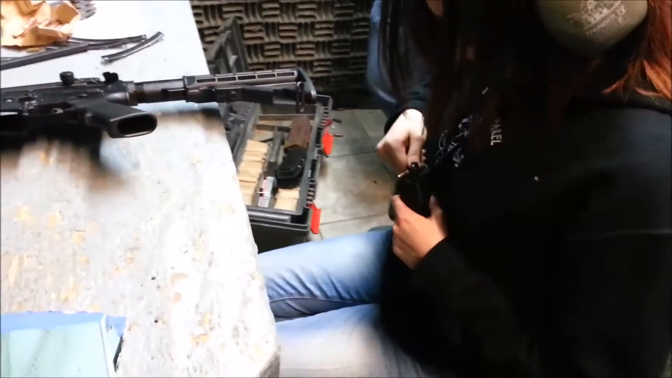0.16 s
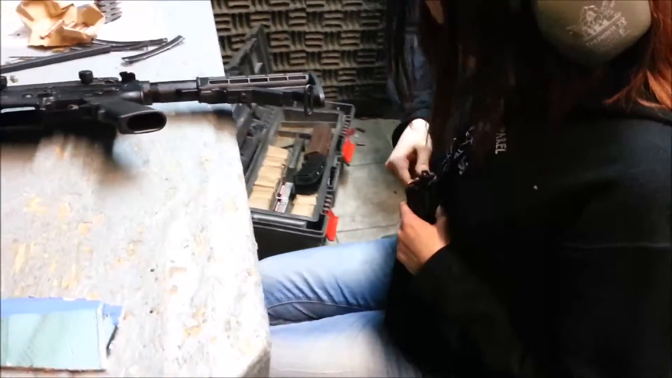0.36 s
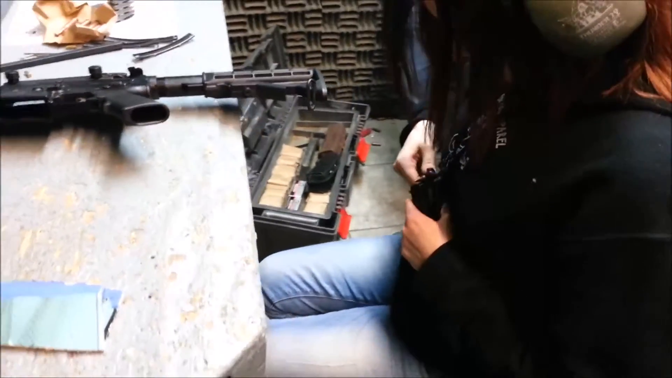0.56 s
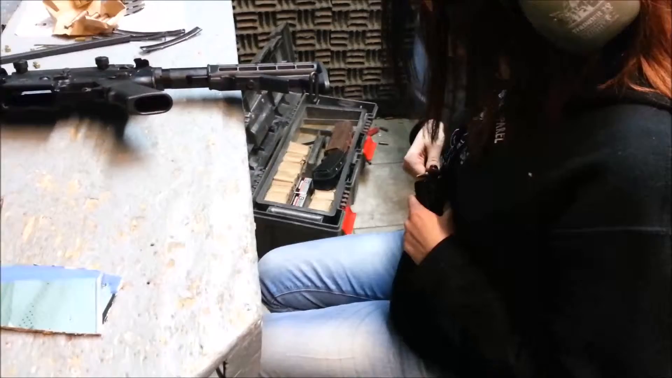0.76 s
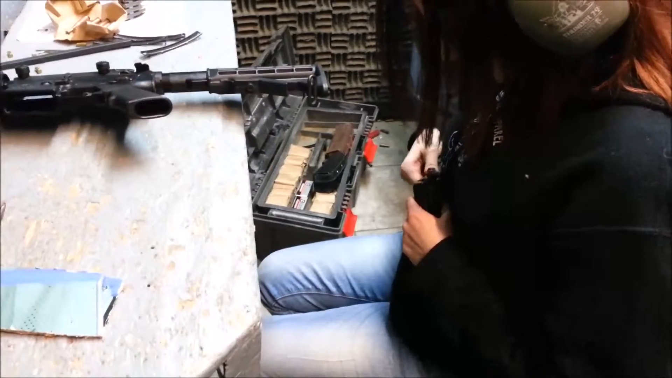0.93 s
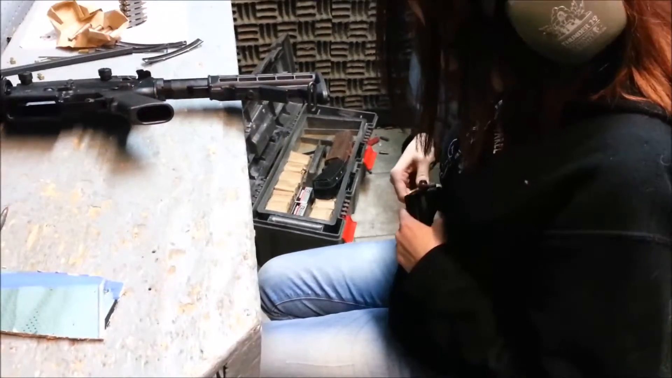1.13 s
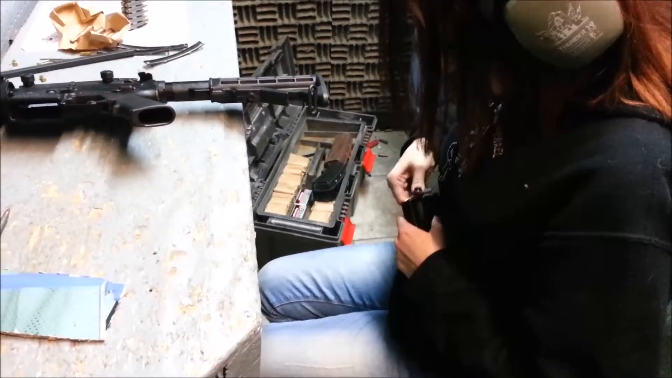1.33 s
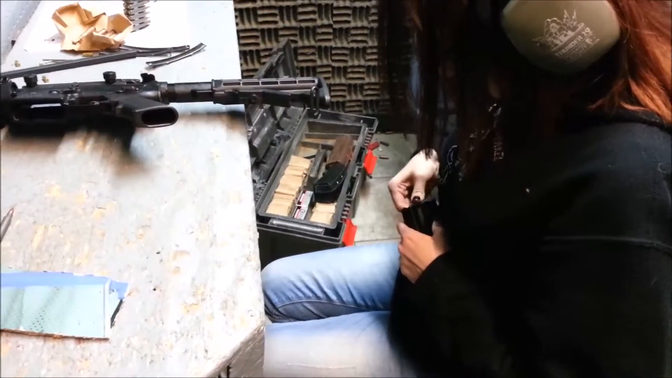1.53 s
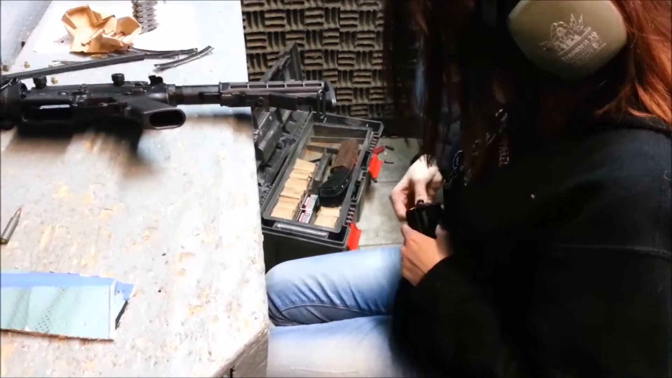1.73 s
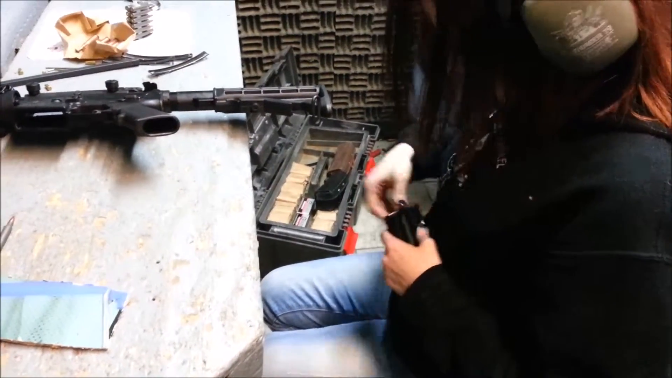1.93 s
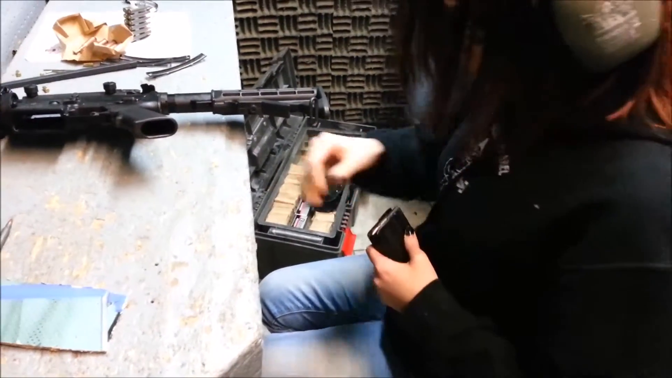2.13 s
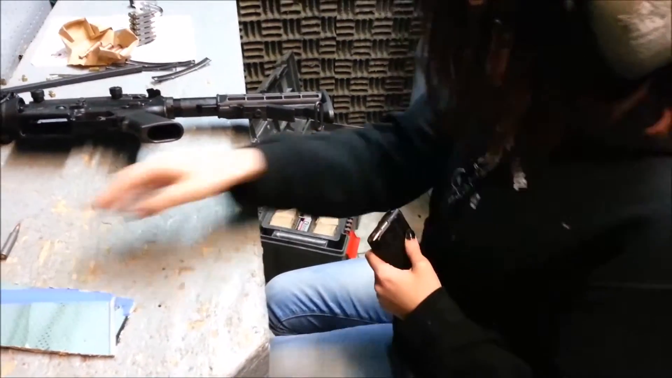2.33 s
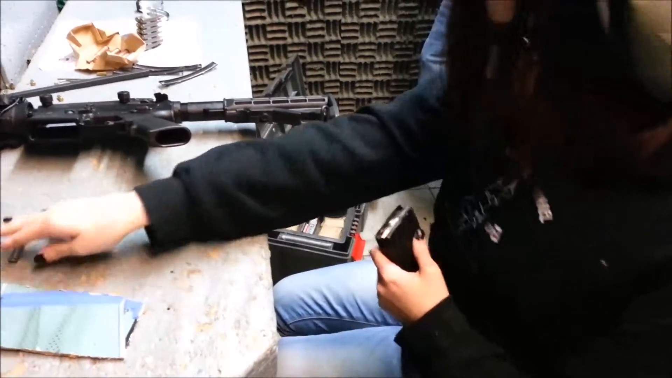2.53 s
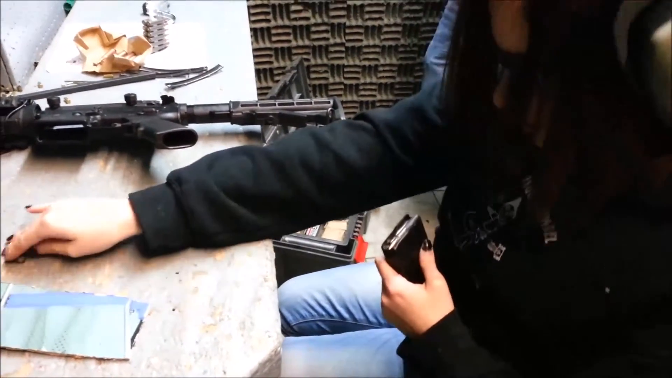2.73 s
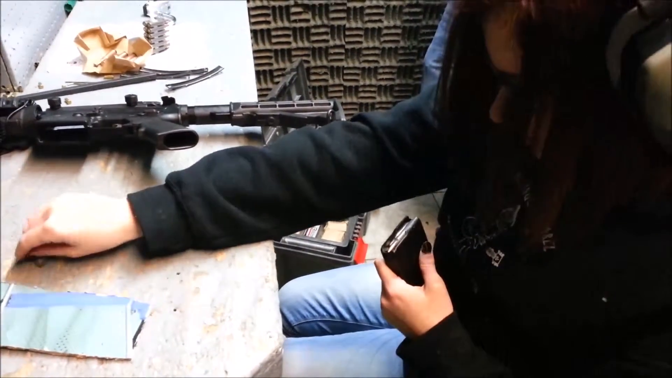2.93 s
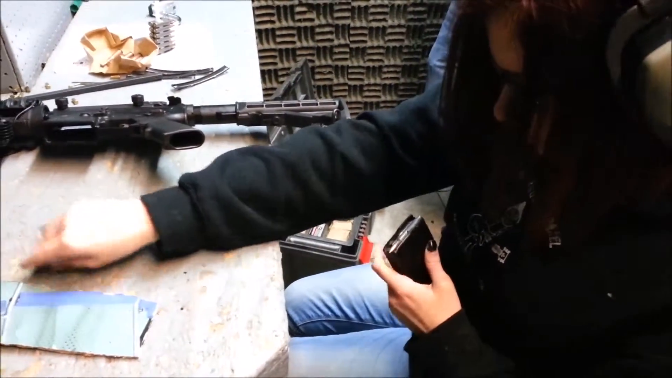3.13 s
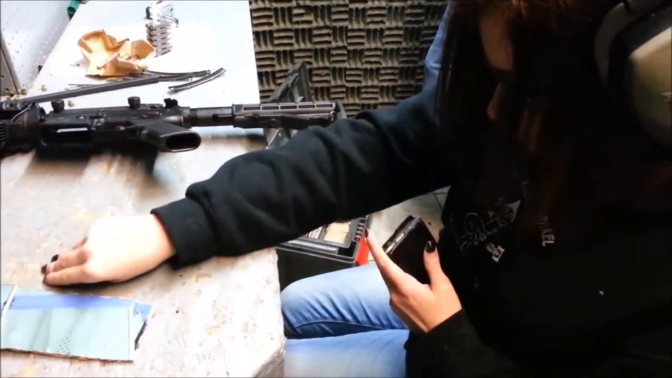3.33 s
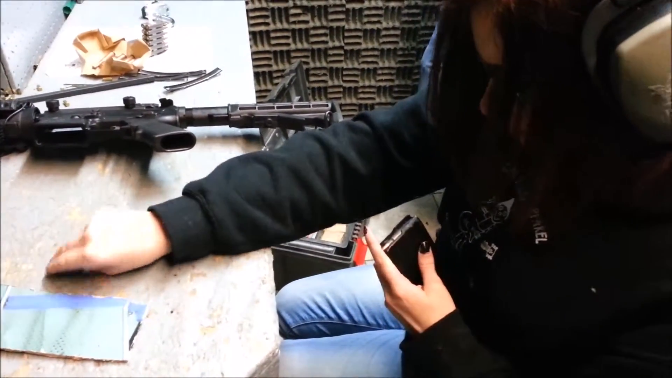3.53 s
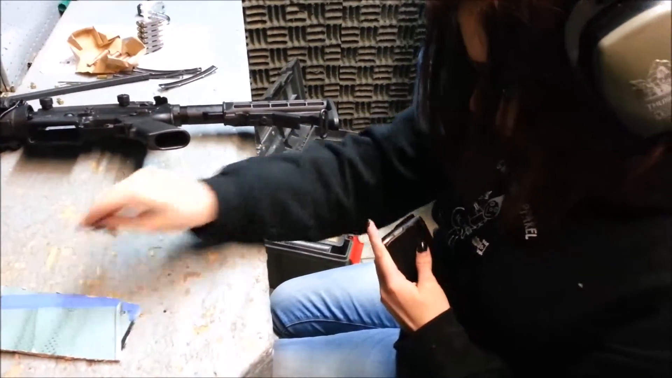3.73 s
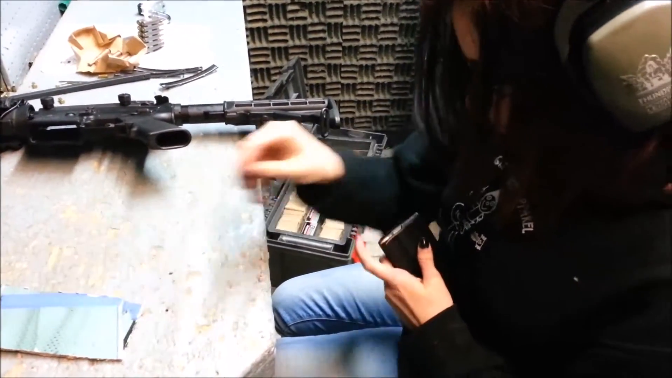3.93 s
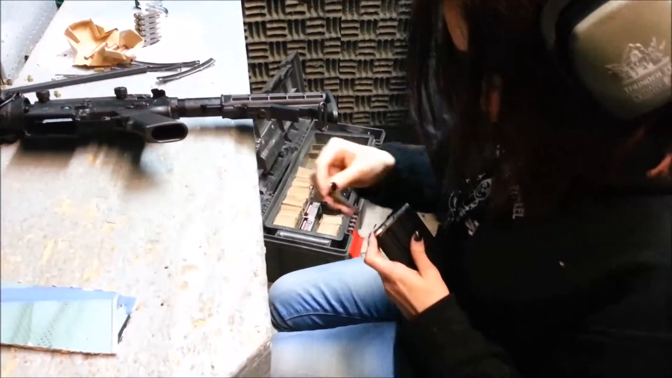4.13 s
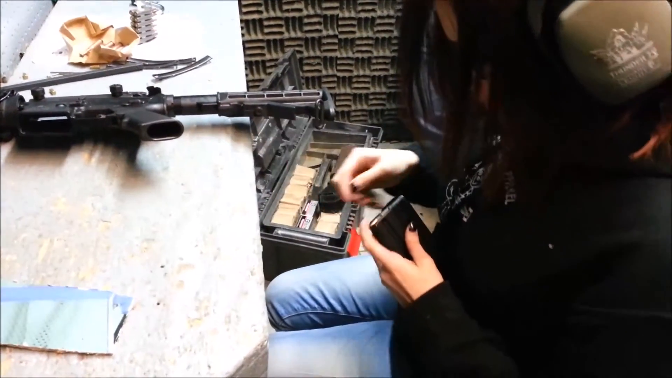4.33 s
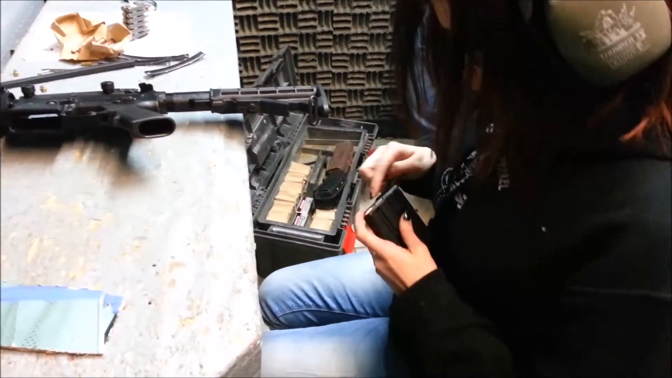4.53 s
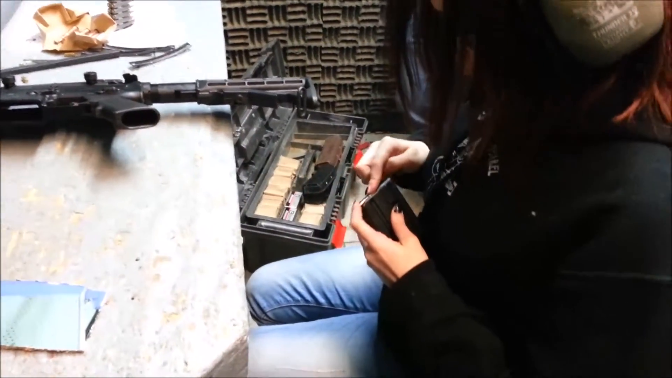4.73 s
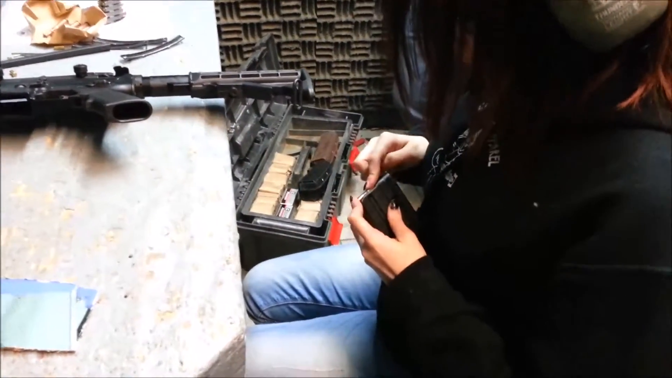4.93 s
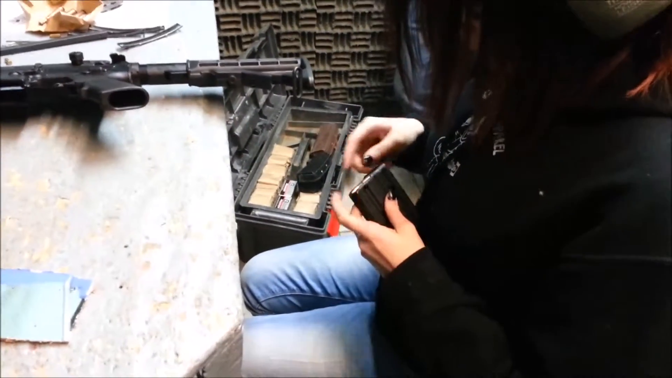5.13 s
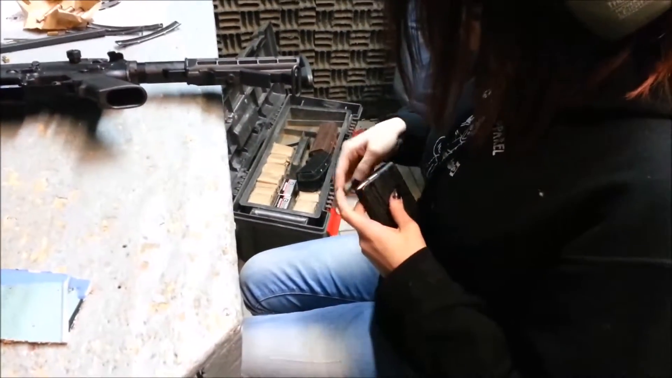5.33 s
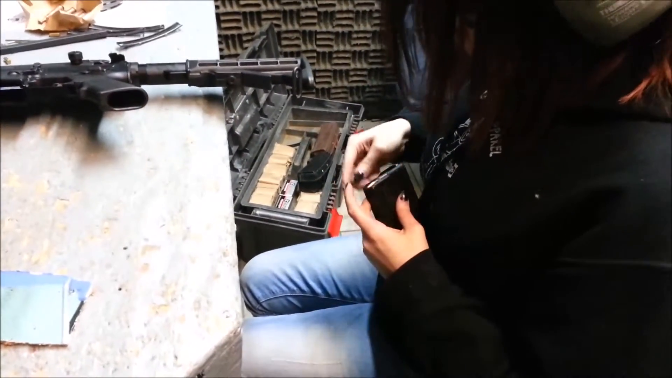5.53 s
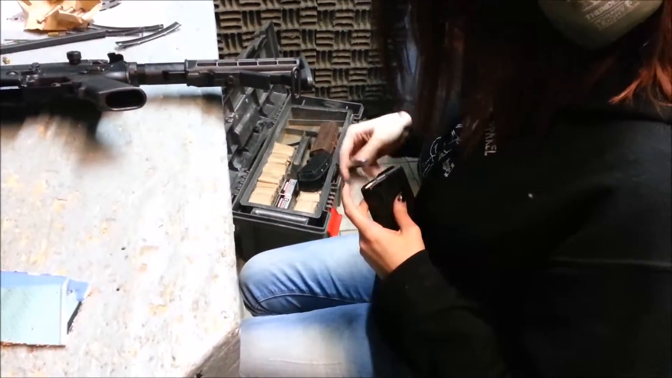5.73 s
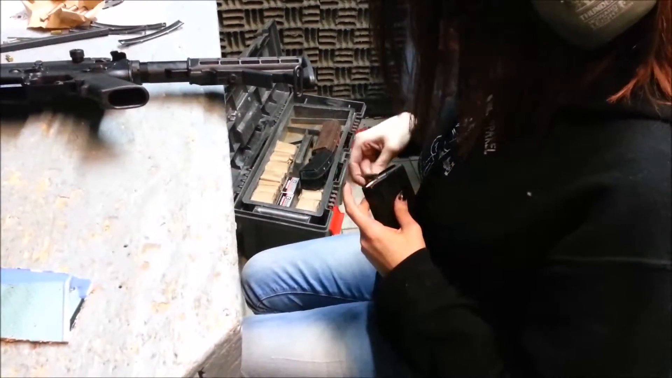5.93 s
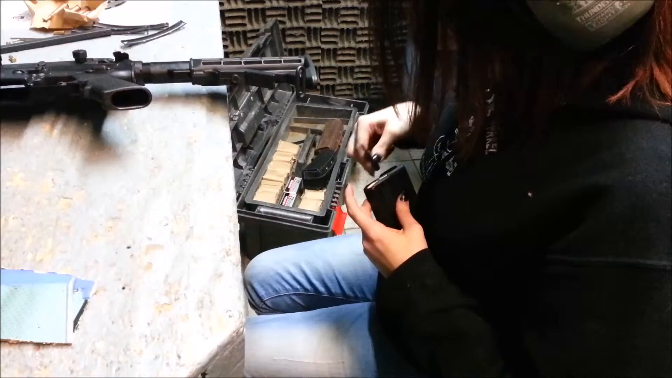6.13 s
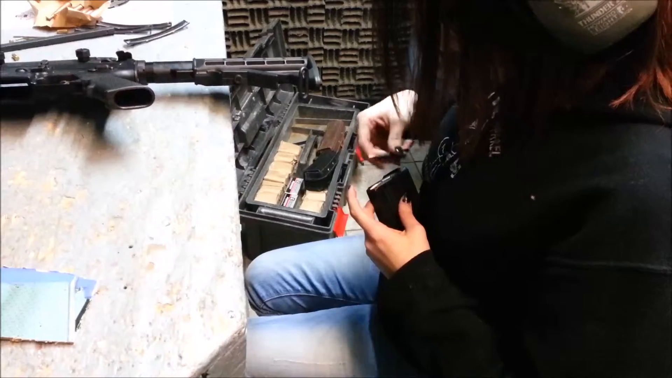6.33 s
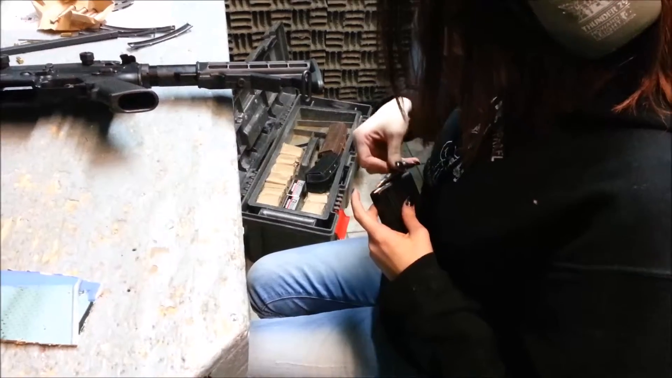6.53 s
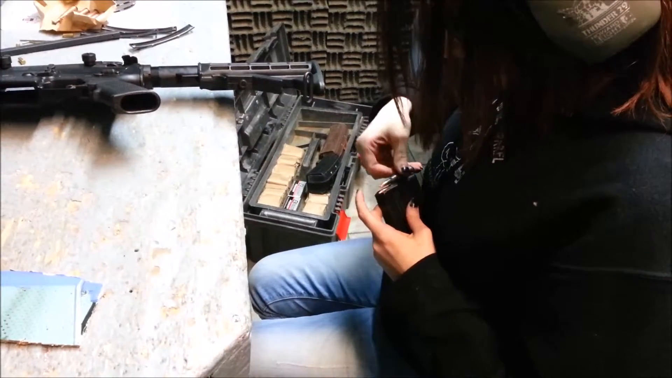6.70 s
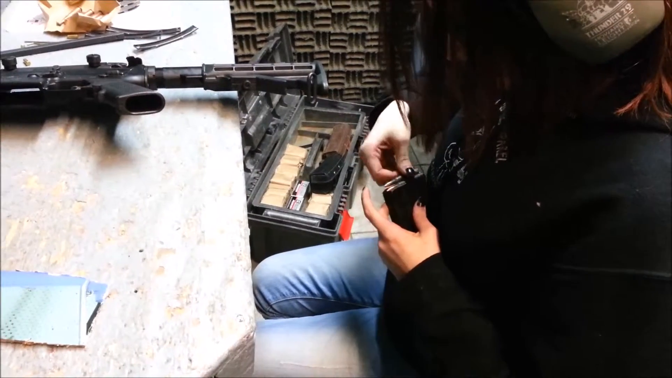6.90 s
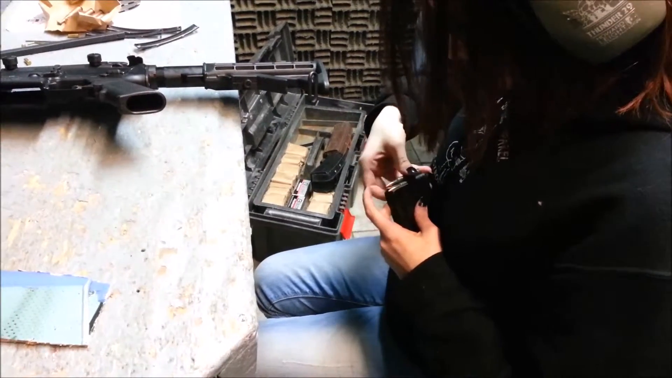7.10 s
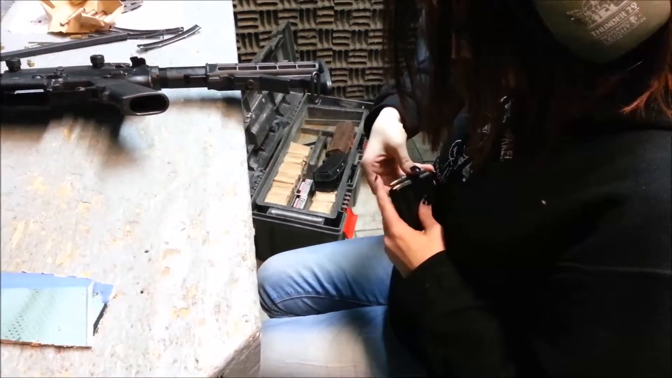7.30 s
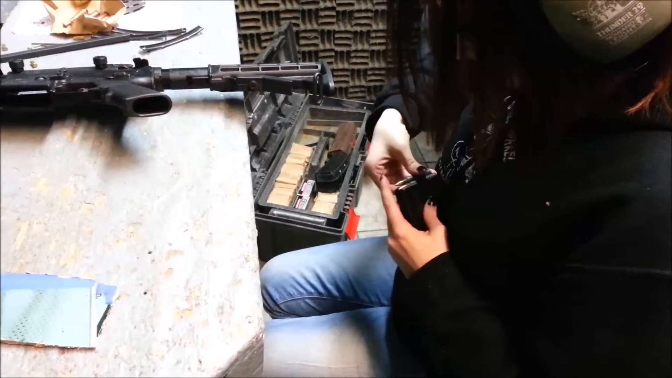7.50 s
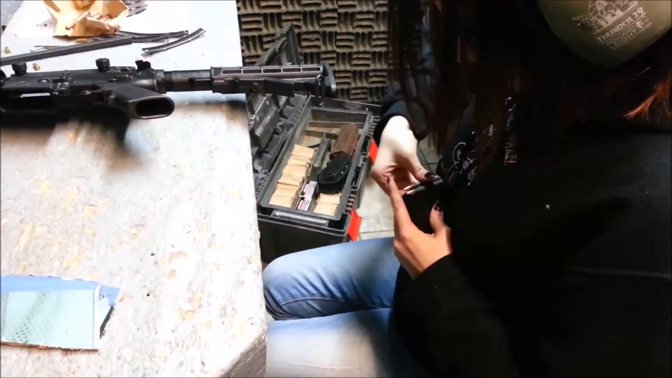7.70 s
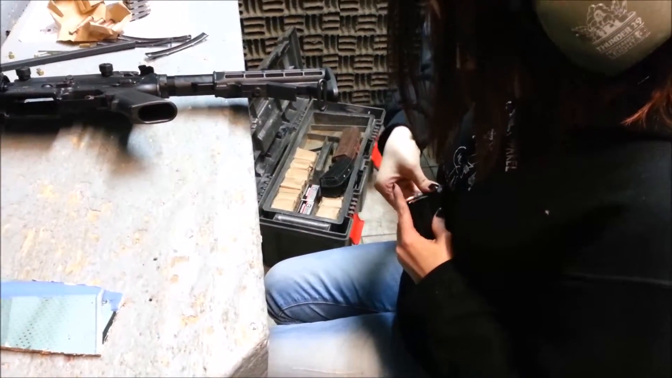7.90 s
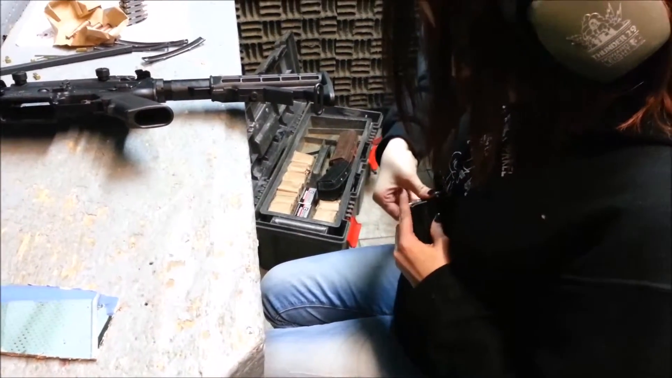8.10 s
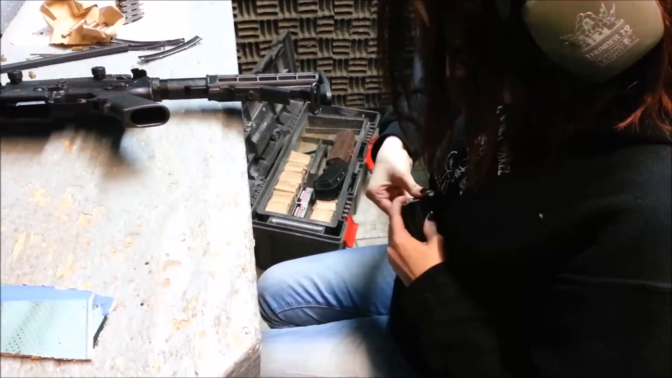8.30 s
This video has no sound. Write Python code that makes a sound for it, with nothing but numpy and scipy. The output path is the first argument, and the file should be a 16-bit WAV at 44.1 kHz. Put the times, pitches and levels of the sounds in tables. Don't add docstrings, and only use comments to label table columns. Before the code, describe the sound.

Close to a phone in a padded indoor booth, someone presses cartridges into a plastic magazine: small hollow knocks, brass clinks, short scrapes, and two very loud snaps. The hand then rakes loose rounds off a bench with chattering and woody knocks. Quieter fiddling clicks follow, then more hard snaps and nail taps. Sleeves rustle over faint ventilation rumble and hiss.

```python
import sys
import numpy as np
from scipy import signal
from scipy.fft import rfft, irfft
from scipy.io import wavfile
from scipy.ndimage import uniform_filter1d

SR = 44100
rng = np.random.default_rng(int(sys.argv[2]) if len(sys.argv) > 2 else 0)


def attenuation_scalar(level_db):
    decades = np.asarray(level_db, float) / 20
    return 10 ** decades


def inscribe(sig):
    pcm = np.round(np.clip(np.atleast_2d(sig).T, -1, 1) * 32767)
    wavfile.write(sys.argv[1], SR, pcm.astype(np.int16))


N = 368676

# pitch_hz, level_db, t60_s
MAGAZINE_MODES = [
    [(673, 1.5, 0.029), (667, -7.5, 0.02), (713, 4, 0.036), (805, 1, 0.018)],
    [(992, 1, 0.0096), (1140, -4, 0.022), (1250, 0.5, 0.02), (1372, -3.5, 0.022), (1542, -4.5, 0.024),
     (1804, -11, 0.026), (1818, -10, 0.061), (1994, -3.5, 0.012)],
    [(2252, 1.5, 0.008), (2360, 3, 0.015), (2620, -0.5, 0.012), (2767, -3.5, 0.014), (2960, -5, 0.013),
     (3040, -3, 0.0063), (3230, -2, 0.029), (3547, -0.5, 0.013), (3850, 0.5, 0.01), (4320, -2, 0.018),
     (4750, -1, 0.018), (4910, -11, 0.012), (5400, -5.5, 0.009), (5930, -11, 0.0029)],
]
# pitch_hz, level_db, t60_s
BENCH_MODES = [
    [(153, 2, 0.036), (225, -10.5, 0.155), (274.4, 0, 0.041), (380, -7, 0.053), (475, -11.5, 0.05),
     (598, -13.5, 0.032)],
    [(738, 6.5, 0.036), (960, 9, 0.0081), (1250, 0.5, 0.088), (1550, 0.5, 0.073), (1680, 1, 0.03),
     (2000, 2, 0.019)],
    [(2540, 6.5, 0.0035), (2740, -4, 0.017), (3180, 8.5, 0.0034), (3400, 7, 0.0039), (4292, -1.5, 0.0093),
     (4860, -1, 0.0027)],
]
# pitch_hz, level_db
CRACK_SPECTRUM = [(3000, -9.5), (5000, -3), (6200, -2), (7800, -3.5), (10500, -7), (13400, -3),
                  (14700, -14.5)]


def read(table, hz):
    f, v = np.transpose(table)
    return np.interp(np.log(np.maximum(hz, 1)), np.log(f), v)


def colour(x, table):
    gain = attenuation_scalar(read(table, np.fft.rfftfreq(x.shape[-1], 1 / SR)))
    y = irfft(rfft(x) * gain, x.shape[-1])
    return y / np.sqrt(np.mean(y ** 2))


def band(x, lo_hz, hi_hz, order=2):
    return signal.sosfilt(signal.butter(order, [lo_hz, hi_hz], "bandpass", fs=SR, output="sos"), x)


def level_curve(table):
    s, db = np.transpose(table)
    return np.interp(np.arange(N) / SR, s, db)


def stereo(mid, side):
    return mid + side * np.array([[1], [-1]])


def causal(log_gain):
    cepstrum = irfft(log_gain)
    cepstrum[1:len(log_gain) - 1] *= 2
    cepstrum[len(log_gain):] = 0
    return np.exp(rfft(cepstrum))


def air():
    # pitch_hz, level_db
    air_spectrum = [(15, -29), (25, -23), (59, -5.5), (115, 1), (154, -0.5), (301, -5.5), (637, -12),
                    (709, -10), (1670, -16.5), (2130, -18), (3180, -17.5), (5880, -24), (13800, -19.5),
                    (15000, -24)]
    steady = stereo(*colour(rng.standard_normal((2, N)), air_spectrum))
    swell = np.interp(np.arange(N), np.linspace(0, N, num=30), rng.standard_normal(30))
    rumble = band(steady, 20, 190)
    return (steady + (attenuation_scalar(1.5 * swell) - 1) * rumble) * attenuation_scalar(-60)


def grains(spread_db, width):
    unevenness = np.minimum(rng.exponential(size=N), 5)
    mid, side = rng.standard_normal((2, N)) * attenuation_scalar(spread_db * unevenness)
    return stereo(mid, width * side)


def handling():
    # time_s, level_db
    effort = [(0.0, -60.5), (0.58, -53), (1.14, -57.5), (1.95, -62), (2.07, -70.5), (2.82, -67.5),
              (2.87, -54), (3.1, -61.5), (3.61, -63.5), (3.9, -63.5), (4.14, -59.5), (4.4, -68), (4.7, -66),
              (5, -67), (6.6, -71), (6.8, -59.5), (7.5, -63.5), (8.15, -55), (8.36, -80)]
    # time_s, level_db
    hand_drag = [(2.7, -55), (2.796, -47.5), (2.916, -41), (3.116, -39.5), (3.29, -55), (3.59, -53),
                 (3.7, -52)]
    # pitch_hz, level_db
    cloth_spectrum = [(250, -21), (400, -1), (650, 3), (1200, 0.5), (2100, 0), (3500, -8), (5000, -8),
                      (7000, -29.5), (12000, -36)]
    rustle_db = level_curve(effort)
    cloth = colour(grains(1.3, 0.46), cloth_spectrum) * attenuation_scalar(rustle_db + 1.5)
    skin_hiss = colour(grains(1.5, 0.22), CRACK_SPECTRUM) * attenuation_scalar(rustle_db - 6)
    drag = band(grains(3, 0.2), 165, 430, order=4)
    return cloth + skin_hiss + drag / drag.std() * attenuation_scalar(level_curve(hand_drag) - 11)


def crowd(x, share, floor_hz, octaves=0.31):
    if share <= 0:
        return x
    spectrum = rfft(x, 8192)
    power, bins = np.abs(spectrum) ** 2, np.arange(len(spectrum))
    total = np.cumsum(power)
    lo = bins * 2 ** (-octaves / 2) - 8
    hi = np.minimum(bins * 2 ** (octaves / 2) + 8, bins[-1])
    broad = (np.interp(hi, bins, total) - np.interp(lo, bins, total)) / (hi - lo)
    fine = uniform_filter1d(power, size=9)
    above = np.clip((bins * SR / 8192 / floor_hz - 1) * 3.5, 0, 1)
    valley_log = np.log((broad + 1e-14) / (fine + 1e-14))
    return irfft(spectrum * causal(share / 2 * above * valley_log))


def hits(events, body, floor_hz, scatter_db, spot_db=0, order=0, size=2048, grit_db=2.5, grip=0.0462,
         rebound_db=-4, fill=0.39, choke=0.81, swell_ms=0.6, reach=3.1):
    out, t = np.zeros(N + 12288), np.arange(3072) / SR
    groups = [np.transpose(modes) for modes in body]
    fades = [np.exp(np.outer(-np.log(1000) * choke / t60, t)) for _, _, t60 in groups]
    crack_gain = attenuation_scalar(read(CRACK_SPECTRUM, np.fft.rfftfreq(4096, 1 / SR)))
    crack = irfft(causal(np.log(crack_gain)))
    for s, db, low_db, high_db, crack_db, rattle_ms, spot_hz in events:
        age = np.arange(size) * 1000 / SR / rattle_ms
        bounces = rng.standard_normal(size) * attenuation_scalar(grit_db * np.minimum(rng.exponential(size=size), 4))
        bounces *= age ** order * np.exp(-age)
        grit = bounces
        if order == 0:
            spread = rfft(bounces)
            even = irfft(spread / causal(np.log(np.abs(spread) + 1e-9)))
            bounces = even * np.exp(-age / 6) * attenuation_scalar(rebound_db)
            bounces[0] += 1
        parts = []
        for (hz, mode_db, _), fade in zip(groups, fades):
            favour_db = -spot_db * np.minimum(np.abs(np.log2(hz / spot_hz)), reach)
            gain = attenuation_scalar(mode_db + favour_db + scatter_db * rng.standard_normal(len(hz)))
            shifted_hz = hz * (1 + grip * rng.standard_normal(len(hz)))
            ring = fade * np.sin(np.outer(2 * np.pi * shifted_hz, t))
            sense = (-1) ** np.arange(len(hz))
            parts.append(gain * sense @ ring)
        parts[0] = parts[0] * (1 - np.exp(-t * 1000 / swell_ms))
        drives = [bounces] * len(parts) + [grit]
        levels_db = (low_db, 0, high_db, crack_db)
        y = np.zeros(size + 4096)
        for part, drive, rel_db in zip(parts + [crack], drives, levels_db):
            sound = signal.fftconvolve(part, drive)
            y[:len(sound)] += sound * attenuation_scalar(db + rel_db) / np.abs(sound).max()
        y = crowd(y, fill * (order == 0), floor_hz)
        at = int(s * SR)
        out[at:at + len(y)] += y
    return signal.sosfilt(signal.butter(7, floor_hz, "highpass", fs=SR, output="sos"), out[:N])


def knocks():
    # start_s, wall_db, cavity_db, lips_db
    thumb_knocks = [(0.1151, -50, 5.5, 3.5), (0.4464, -52, 5, -12), (0.4643, -32, -1, -4.5),
                    (0.5492, -53.5, 14, -17), (0.5675, -26, 0.5, -0.5), (0.7138, -35, 0, -4),
                    (1.074, -37, 2, -8), (1.1892, -39, -4, -3), (1.3875, -35.5, 0, -34),
                    (1.4521, -42, 0, -27), (1.5179, -52, 7, -19), (1.5412, -44.5, 3, -14),
                    (1.7704, -43, -2, -10), (1.7883, -53, 6, -13), (1.8113, -49, 4, -16),
                    (1.9013, -32, -10.5, -15), (3.682, -33, 10.5, -3), (3.9784, -45, 5, -0.5),
                    (4.0223, -40, -19, -30), (4.0435, -42.5, 2.5, -2), (4.064, -42.5, -3, -3),
                    (4.157, -42, -6, -6), (4.8348, -27.5, 7.5, -7.5), (5.5478, -51.5, -2.5, -10),
                    (7.3956, -40.5, -10, -7.5), (7.9014, -40.5, -0.5, -15), (8.1579, -40, -18, -19),
                    (8.175, -43, 3.5, 0), (8.1894, -50, -3, -14.5), (8.2746, -46.5, -7, -14.5)]
    events = [(s, db, cavity, lips, 0.95 * lips - 11, 2.6, 980) for s, db, cavity, lips in thumb_knocks]
    return hits(events, MAGAZINE_MODES, 600, scatter_db=2.5, spot_db=5.5, grip=0.03, rebound_db=-2,
                fill=0.75, choke=1.3, swell_ms=1.8)


def slides():
    # start_s, wall_db, cavity_db, lips_db, swell_ms
    brass_slides = [(0.124, -59, -19, 15.5, 37), (0.681, -50.5, -20, 2, 60), (1.199, -41, -2.5, -14, 13),
                    (1.068, -52.5, -15, 16, 11.3), (1.095, -47, 0, -9, 4.9), (1.908, -47.5, -2, 9, 14),
                    (3.78, -65, -11, 0.5, 33), (4.0, -43, -5, -9.5, 33), (3.879, -63.5, -2, -4.5, 37),
                    (4.05, -54, -7, -8, 30), (4.12, -51.5, -5, -3, 13), (4.58, -52.5, -14.5, -3, 37),
                    (6.771, -37, -18, 4, 94), (7.062, -37.5, -32, 4.5, 10.6), (7.225, -44, -5, -10, 12.5),
                    (8.16, -40, -25, -8.5, 28)]
    events = [(s, db, cavity, lips, 0.95 * lips - 6.5, ms, 980) for s, db, cavity, lips, ms in brass_slides]
    return hits(events, MAGAZINE_MODES, 510, scatter_db=4.5, order=1, size=8192, grit_db=-1, grip=0.015,
                choke=1.3)


def clinks():
    # start_s, lips_db, crack_db, pitch_hz
    brass_clinks = [(0.1356, -45, -14, 3070), (0.4745, -29.5, -6, 3400), (1.081, -35, 4.5, 4640),
                    (1.106, -34, -26.5, 4630), (5.044, -46.5, -20.5, 2600), (5.819, -49.5, -20, 2800),
                    (5.0514, -45.5, 1, 3130), (5.347, -46, -15, 3120), (5.4558, -45.5, 1.5, 4130),
                    (5.597, -45, -7.5, 3150), (5.6175, -35, -31, 2650), (5.827, -47, -12, 3310),
                    (6.205, -45, -1.5, 3130), (6.235, -52.5, -10, 2600), (6.271, -53, -9.5, 2700),
                    (6.447, -45, -19.5, 3274), (6.49, -44, -2.5, 3300), (3.99, -46, -12, 2600),
                    (4.032, -46, -12, 3200), (4.085, -48, -12, 2300), (4.135, -47, -12, 3400),
                    (7.07, -44, -5, 3100), (7.093, -35, -6, 3300), (7.027, -38, 8.5, 4860),
                    (7.0604, -41.5, 6, 3360), (7.082, -30.5, 4, 3230), (7.6994, -45, -5, 2400),
                    (7.719, -40, 2, 3140)]
    events = [(s, db - 10, -11, 10, crack + 10, 3.5, hz) for s, db, crack, hz in brass_clinks]
    return hits(events, MAGAZINE_MODES, 1250, scatter_db=1.5, spot_db=15, grip=0.02, rebound_db=6,
                fill=0.6, choke=1.6)


def scrapes():
    # start_s, board_db, thud_db, crack_db, swell_ms
    bench_scrapes = [(.44, -71, 26, -2, 51), (.6, -63.5, 12, 22, 96), (1.083, -45, -20, 8.5, 12),
                     (7.691, -49, -6, 4, 12), (2.808, -40, -5, -26, 60), (2.95, -46.5, 14.5, -28, 42),
                     (3.2, -50.5, 9.5, 2, 50), (3.49, -51.5, 12.5, -12.5, 28)]
    events = [(s, db, thud, -12, crack, ms, 980) for s, db, thud, crack, ms in bench_scrapes]
    return hits(events, BENCH_MODES, 150, scatter_db=4.5, order=1, size=8192, grit_db=2.5)


def snaps():
    # start_s, wall_db, cavity_db, lips_db, pitch_hz (colours relative to the walls)
    lip_snaps = [(0.9205, -9.5, -6, 2.5, 4100), (0.9186, -2.5, -5, 2.5, 1337),
                 (1.5847, -32.5, 1, -7.5, 1289), (1.6074, -3, -7.5, 2, 4150), (1.6099, -5, -5, 2.5, 1200),
                 (1.6134, -9, -10, 3.5, 2353), (6.8429, -14, -30, 7.5, 1750),
                 (6.8472, -3, -8.5, -2.5, 3482), (6.86, -15.5, -33, 1.5, 1250),
                 (8.0223, -29, 11.5, 16.5, 2430), (8.0296, -11.5, -11.5, 9.5, 4097),
                 (8.0277, -9, 0, -3.5, 2620)]
    rim_cracks = [0.5, -2.5, -8, 2.5, 1.5, 0.5, 2.5, -3, 4.5, 13, 5.5, -4]
    events = [(s, db, cavity, lips, rim, 2.2, hz)
              for (s, db, cavity, lips, hz), rim in zip(lip_snaps, rim_cracks)]
    return hits(events, MAGAZINE_MODES, 620, scatter_db=1.5, spot_db=10, reach=0.51, grip=0.018,
                rebound_db=2.5, fill=0.9, choke=1.6, swell_ms=0.8)


def taps():
    # start_s, wall_db, lips_db, pitch_hz
    nail_taps = [(1.2211, -28, -11.5, 1410), (1.3606, -28, -4.5, 1040), (1.8314, -40.5, -10, 1640),
                 (3.6844, -28.5, -14.5, 1680), (3.9424, -52.5, -9.5, 2270), (4.011, -36.5, -4, 1900),
                 (5.101, -53.5, -6, 1500), (6.9, -33, -19, 1400), (4.274, -51, 0.5, 2050),
                 (4.405, -47, -15, 2000), (4.594, -51, -7, 1496), (4.8715, -34.5, -11, 1800),
                 (5.9642, -42, -11.5, 1220), (5.975, -45.5, -12, 1100), (6.744, -32.5, -25, 1230),
                 (7.014, -38, -22, 1060), (7.182, -35, 3, 3300), (7.2582, -34, -0.5, 1750),
                 (7.616, -35, -26, 1310), (7.649, -25, -7, 1250), (7.7703, -30.5, -11, 969),
                 (7.8108, -46, 2.5, 1850), (7.8476, -43.5, -21, 1280), (7.9172, -28.5, -2, 1220),
                 (7.9414, -33.5, -10.5, 1860)]
    events = [(s, db, -15.5, lips, 0.95 * lips - 10.5, 2.4, hz) for s, db, lips, hz in nail_taps]
    return hits(events, MAGAZINE_MODES, 600, scatter_db=1, spot_db=10, grip=0.017, rebound_db=0.5,
                fill=0.17, choke=1.4)


def seats():
    # start_s, wall_db, lips_db, crack_db, pitch_hz
    seatings = [(1.5925, -9, 0, -2, 1112), (6.5937, -9, -1, -2.5, 1560), (6.6018, -16.5, -9, -22, 1600),
                (6.7937, -29, -15.5, -23, 1580), (6.7996, -13.5, -6, -18, 1460),
                (6.8216, -8, -8, -12, 1200)]
    events = [(s, db, -23, lips, crack, 2.3, hz) for s, db, lips, crack, hz in seatings]
    return hits(events, MAGAZINE_MODES, 700, scatter_db=2, spot_db=16.5, reach=0.63, grip=0.015,
                rebound_db=2.5, fill=0.56, choke=1.1)


def raking():
    # start_s, board_db, thud_db, brass_db, pitch_hz
    strikes = [(2.774, -49.5, 3, 12, 2430), (2.886, -41, 5, -14, 1540), (2.896, -37.5, 1, -6, 1240),
               (2.948, -39, -24, 3, 1820), (2.958, -25, -4, -1.5, 1220), (2.9687, -20.5, -9.5, -4.5, 1250),
               (2.978, -25.5, -5.5, -4, 1280), (2.992, -45.5, 2, -14, 1220), (3.02, -32, -1, -22, 783),
               (3.038, -51, 11, -12, 848), (3.117, -27, -4.5, -29, 773), (3.126, -27.5, -12, -25, 1140),
               (3.176, -37, -7, -26, 1540), (3.209, -54, -7, 13, 753), (3.219, -29.5, -3, 6, 3100),
               (3.236, -49, 10, 9, 1350), (3.274, -31.5, -25, 6.5, 3180), (3.403, -31.5, -9.5, -8, 774)]
    # start_s, board_db, brass_db, pitch_hz
    clashes = [
        (3.096, -33.5, 10.5, 762),
        (3.506, -34, 10, 2350),
        (3.518, -39, -6, 1100),
    ]
    events = [(s, db, thud, brass, -28, 1.4, hz) for s, db, thud, brass, hz in strikes]
    events += [(s, db, -10, brass, 6, 0.6, hz) for s, db, brass, hz in clashes]
    return hits(events, BENCH_MODES, 147, scatter_db=1, spot_db=7.5, grip=0.031, rebound_db=-1,
                fill=0.36, choke=0.91)


def chatter():
    # start_s, board_db, brass_db
    skips = [(2.8176, -35, 3.5), (2.8302, -31.5, 5), (2.8416, -34.5, 8), (2.8548, -33.5, 1),
             (2.867, -34, 1), (2.8856, -38.5, 2.5), (2.8974, -50, -1), (2.9108, -32.5, 3.5)]
    # pitch_hz, level_db, t60_s
    round_modes = [
        [(550, -5, 0.022), (880, 0, 0.014)],
        [(1500, -2, .02), (1720, -1, 0.039), (1900, -6, 0.036)],
        [(2340, 6.5, 0.0081), (3100, 3, 0.0044), (3620, -4, 0.0055), (4040, -12, 0.0083)],
    ]
    events = [(s, db, -3, brass, -28, 0.9, 1750) for s, db, brass in skips]
    return hits(events, round_modes, 300, scatter_db=5, grip=0.01, rebound_db=-6, fill=0.16)


def room(x, wet_db, gap_ms):
    # pitch_hz, t60_s
    decay = [(300, 0.072), (1000, 0.125), (2000, 0.13), (3000, 0.16), (5500, 0.094), (8000, 0.11),
             (14000, 0.085)]
    # pitch_hz, level_db
    echo_colour = [(300, -5.5), (1200, 0.5), (2200, 0.5), (2800, 1.5), (3600, 0), (5000, -1.5), (7000, 0),
                   (12000, -0.5)]
    t = np.arange(SR // 3) / SR
    tail = 0
    for hz in 180 * 2. ** np.arange(7):
        mid, side = band(rng.standard_normal((2, len(t))), hz / np.sqrt(2), hz * np.sqrt(2))
        pair = stereo(mid, min(hz / 1500, 1) * side)
        tail = tail + pair / pair.std() * np.sqrt(hz) * attenuation_scalar(-60 * t / read(decay, hz))
    spectrum = rfft(tail)
    even = spectrum / np.sqrt(uniform_filter1d(np.abs(spectrum) ** 2, size=60))
    tail = colour(irfft(even, len(t)), echo_colour)
    tail *= np.clip(t * 1000 / gap_ms - 1, 0, 1) * (t < 1 / 4)
    tail *= attenuation_scalar(wet_db) / np.sqrt(np.sum(tail ** 2) / 2)
    return signal.fftconvolve(x[None], tail)[:, :N]


def ports(x, lag_ms=0., aim=0.99):
    # pitch_hz, level_db
    shadow = [(300, -1.5), (700, 0), (1100, 0), (1500, 4), (2200, 8.5), (3200, 9.5), (4500, 2.5),
              (6400, -2), (9000, -1), (13000, 1.6)]
    # pitch_hz, phase_rad
    lead = [(300, 1.5), (700, 0.45), (1300, 1.26), (2200, 1.2), (3200, -0.5), (4500, 0.018), (7500, -2),
            (12000, -1.74)]
    hz = np.fft.rfftfreq(N, 1 / SR)
    phase = aim * read(lead, hz) - 2 * np.pi * hz * lag_ms / 1000
    half = attenuation_scalar(aim * read(shadow, hz) / 2) * np.exp(0.5j * phase)
    return irfft(rfft(x * np.ones((2, 1))) * np.array([half, 1 / half]), N)


def scene():
    magazine = knocks() + slides() + clinks() + snaps() + taps() + seats()
    bench = scrapes() + raking() + chatter()
    echoes = room(magazine + bench, wet_db=-7.5, gap_ms=1.9)
    near = ports(magazine + handling()) + ports(bench, lag_ms=0.272)
    return near + ports(echoes, aim=0.45) + air()


def top_cut(x):
    return signal.sosfilt(signal.butter(12, 15420, fs=SR, output="sos"), x)


def record(dry):
    cut = signal.sosfilt(signal.ellip(8, 0.2, 60, 14700, fs=SR, output="sos"), dry)
    overload = np.maximum(np.abs(cut) - 0.72, 0)
    mix = np.clip(cut - 0.23 * overload, -1, 1)
    return top_cut(mix)


dry = scene()
out = record(dry)
inscribe(out)
```